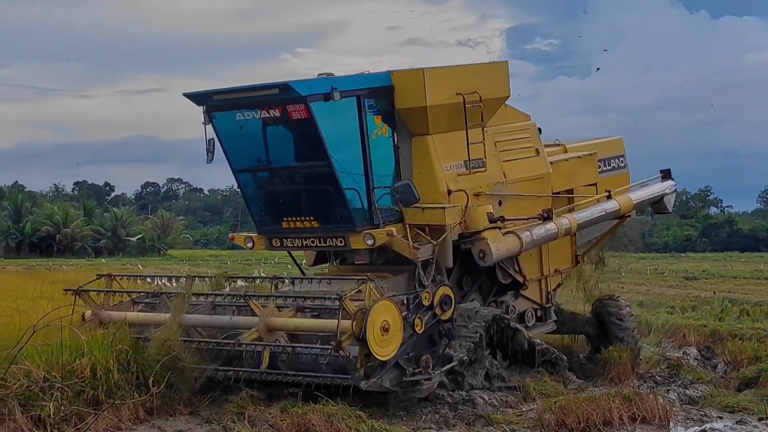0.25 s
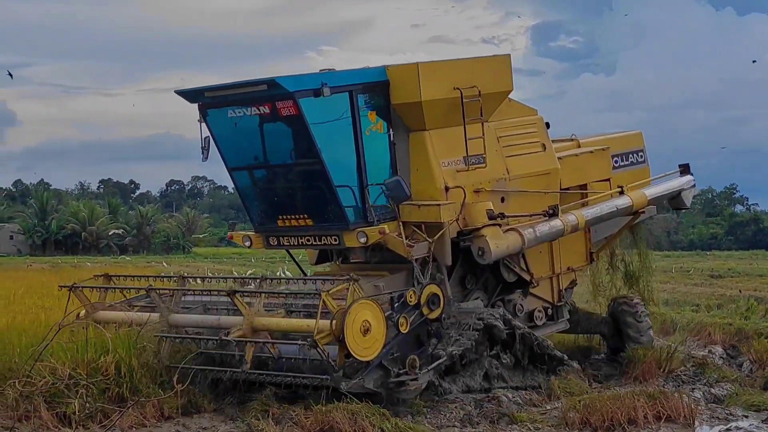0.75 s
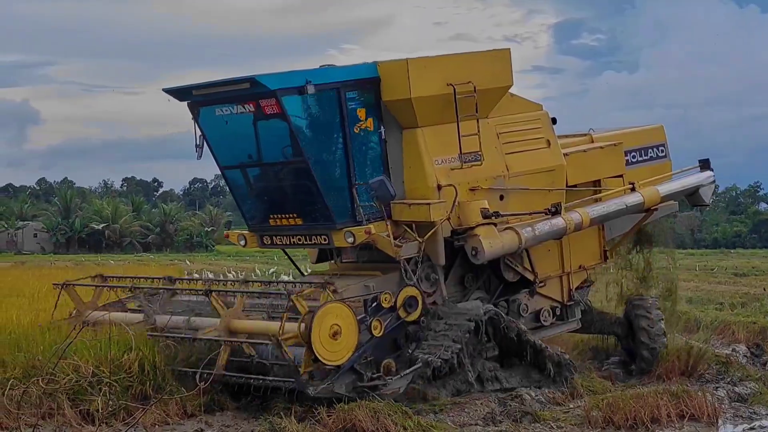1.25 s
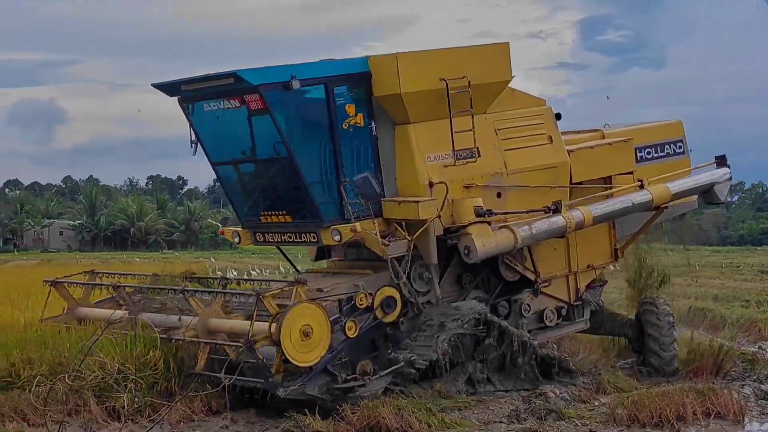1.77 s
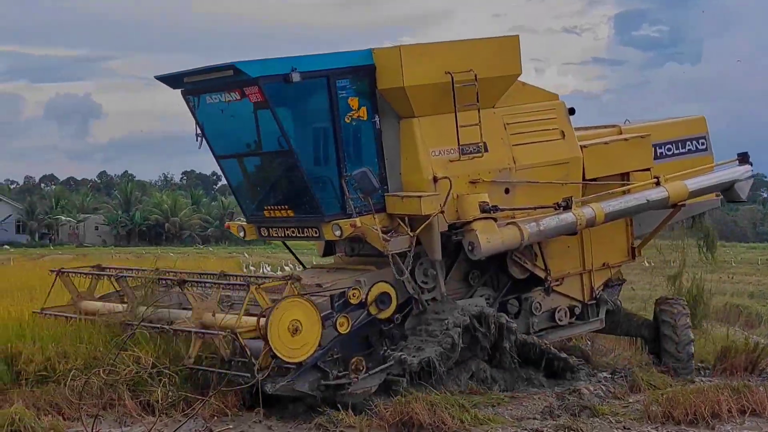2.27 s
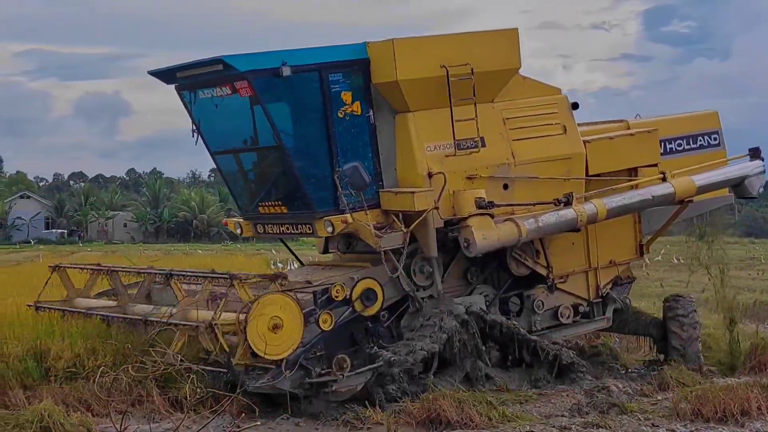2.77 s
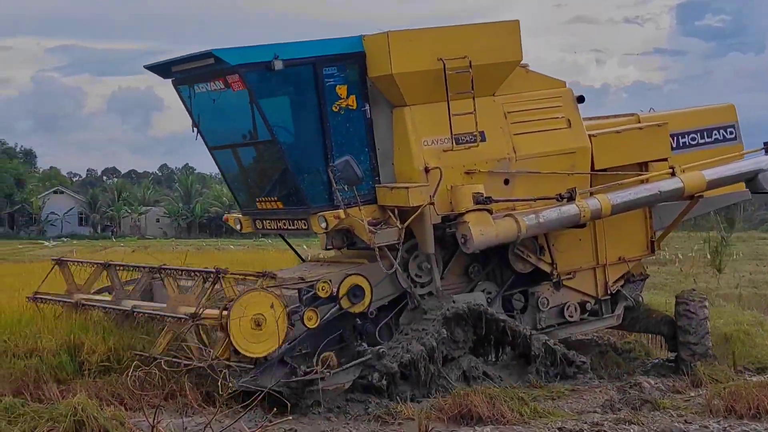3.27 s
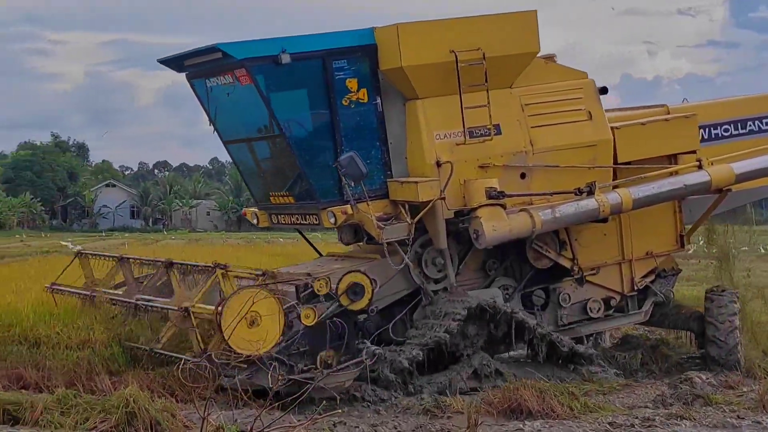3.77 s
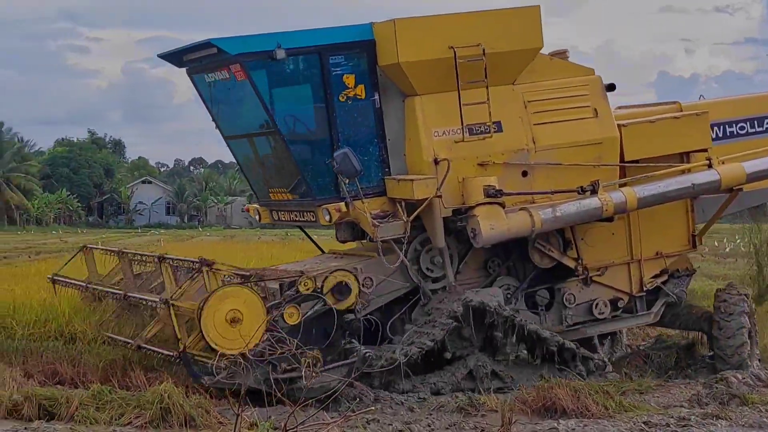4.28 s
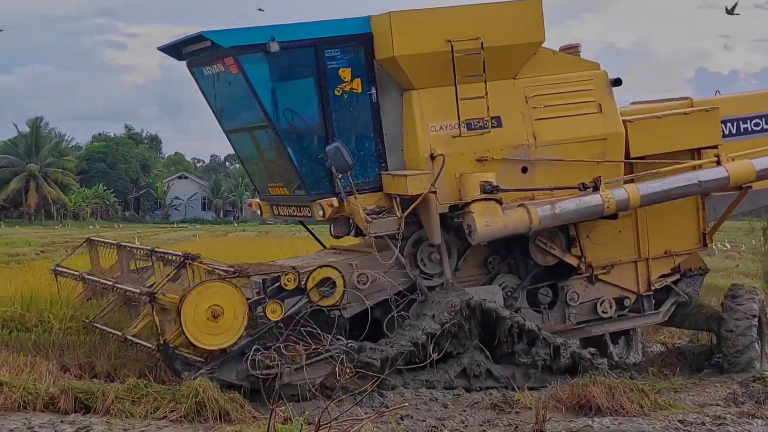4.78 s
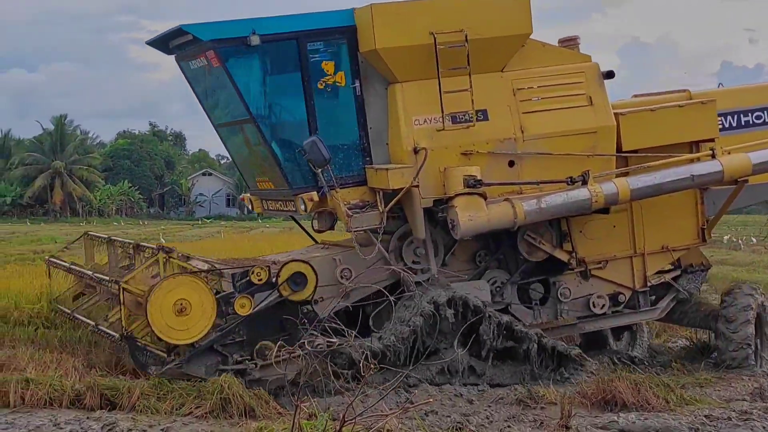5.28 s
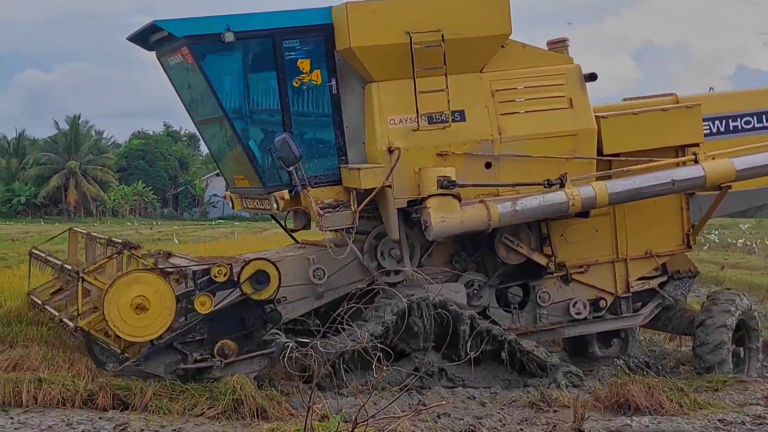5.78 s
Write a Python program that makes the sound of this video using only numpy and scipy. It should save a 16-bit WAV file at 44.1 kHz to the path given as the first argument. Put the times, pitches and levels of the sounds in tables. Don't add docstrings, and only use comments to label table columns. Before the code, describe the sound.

A big diesel harvester drones at a steady low pitch, dull rumble beneath, while rattling metallic knocks and straw hiss grow as its side turns closer.

```python
import sys
import numpy as np
from scipy import signal
from scipy.io import wavfile
from scipy.ndimage import uniform_filter1d, minimum_filter1d

SR = 44100
rng = np.random.default_rng(int(sys.argv[2]) if len(sys.argv) > 2 else 0)


def decibels_to_gain(level_db):
    exponent = np.asarray(level_db, float) / 20
    return 10 ** exponent


def transcribe(signal):
    frames = np.atleast_2d(signal).T
    limited = np.clip(frames, -1, 1)
    pcm = np.round(limited * 32767).astype(np.int16)
    wavfile.write(sys.argv[1], SR, pcm)


N = 266364
LAG_S = .0005


def evened(x):
    return x / np.sqrt(np.mean(x ** 2) + 1e-20)


def curves(rows):
    s, *columns = np.transpose(rows)
    return [np.interp(np.arange(N) / SR, s, c) for c in columns]


def read(points, hz):
    f, *columns = np.transpose(points)
    return np.array([np.interp(np.log(hz + 1), np.log(f), c) for c in columns])


def turned(s):
    # start_s, end_s
    turn_s = [1.2, 4.8]
    return np.clip((s - turn_s[0]) / (turn_s[1] - turn_s[0]), 0, 1)


def bay_facing():
    # time_s, share (0-1)
    openness = [(0, 0), (1.5, 0), (2.5, 0.46), (3.1, 0.59), (3.7, 0.51), (4.1, 0.53), (4.36, 0.58),
                (4.45, 0.89), (4.8, 0.77), (5.55, 0.84), (5.75, 0.41), (6.04, 0.62)]
    return curves(openness)[0]


def exhaust(turns):
    multiples = [1 / 3, 2 / 3, 4 / 3, 3, 4, 5, 6, 7, 8]
    signs = [1, 1, 1, 1, -1, 1, -1, 1, 1]
    # before_turn_db, after_turn_db
    orders_db = [(-44, -42), (-33, -28), (-38, -29), (-35, -38), (-34, -25), (-35, -44), (-37, -24),
                 (-50, -40), (-35, -36)]
    turn = turned(np.arange(N) / SR)
    angle = 2 * np.pi * (turns + np.array([[1], [-1]]) * 0.013)
    second_phase = 2.33 - 2.4 * turn
    out = np.cos(angle) + decibels_to_gain(-18.5 + turn) * np.cos(2 * angle + second_phase)
    for k, (before_db, after_db), sign in zip(multiples, orders_db, signs):
        size = (1 - turn) * decibels_to_gain(before_db) + sign * turn * decibels_to_gain(after_db)
        out += size * np.cos(k * angle + 2 * np.pi * rng.random())
    drone_db = -5.5 - 1.6 * turn
    return np.sqrt(2) * decibels_to_gain(drone_db) * out


def wash(spectrum, patchy_db, ridge_db, flicker_db):
    # frequency_hz, coherence (0-1)
    coherence = [(25, .97), (125, .99), (250, .97), (500, .94), (1000, .85), (2000, .8), (4000, .75),
                 (8000, .58), (15000, .45)]
    # frequency_hz, phase_rad
    port_lead = [(0, 0), (1380, 0.5), (2240, 5.6), (3100, 6.9), (3620, 12.0), (4740, 13.2), (6460, 18.9),
                 (7670, 25.3), (8270, 31.2), (9820, 34.6), (10900, 35.6), (12600, 43.1), (13400, 43.9),
                 (15700, 54.2)]
    frames, hz = N // 256 + 5, np.fft.rfftfreq(1024, 1 / SR)
    a, b, c, d, patches, ridges = rng.standard_normal((frames, 513, 6)).T
    patches = uniform_filter1d(uniform_filter1d(patches, size=14, axis=0), size=10, axis=1)
    ridges = uniform_filter1d(uniform_filter1d(ridges, size=3, axis=0), size=120, axis=1)
    flicker = uniform_filter1d(rng.standard_normal(frames), size=6)
    same = np.clip(read(coherence, hz)[0], 0, 1)[:, None]
    late = np.exp(-1j * np.interp(hz, *np.transpose(port_lead)))[:, None]
    left = a + 1j * b
    right = same * late * left + np.sqrt(1 - same ** 2) * (c + 1j * d)
    turn = turned(np.arange(frames) * 256 / SR)
    colour_db = read(spectrum, hz)[:, :, None]
    colour_db = (1 - turn) * colour_db[:2] + turn * colour_db[2:]
    change_db = patchy_db * evened(patches) + ridge_db * evened(ridges) + flicker_db * evened(flicker)
    z = np.array([left, right]) * decibels_to_gain(colour_db + change_db)
    return evened(signal.istft(z, nperseg=1024, noverlap=768)[1][:, :N])


def threshing_roar():
    # frequency_hz, header_left_db, header_right_db, engine_left_db, engine_right_db
    roar_spectrum = [(25, -23, -23, -23, -23), (45, -16, -16, -16, -16), (68.6, 2, 3, 1, 1),
                     (162, -5, 5.5, -7.5, 1.5), (308, -1.5, -1.5, -6, -3.5), (447, -8.0, -9.5, -8, -10),
                     (564, -10, -6.5, -11.5, -11.5), (725, -13.5, -8.5, -8, -5),
                     (820, -18.5, -11.5, -14, -14), (940, -5.5, -11, -5.5, -5.5),
                     (1100, -17.5, -5.5, -16, -8), (1140, -34, -16.0, -43, -24),
                     (1250, -14.5, -24, -17, -20.5), (1810, -18.5, -17, -19.5, -15)]
    spectrum = list(roar_spectrum) + [(2390, -55, -60, -64, -60)]
    return decibels_to_gain(-18) * wash(spectrum, patchy_db=0.35, ridge_db=1.0, flicker_db=0.0)


def straw_hiss(turns):
    # frequency_hz, header_left_db, header_right_db, engine_left_db, engine_right_db
    hiss_spectrum = [(1985, -4.5, -20, -10.5, -9), (2110, -8, -3, -14, -5), (2710, -7, -3, -9, -13),
                     (3390, -1, 4.5, -19, -2), (4630, -7.5, -9, -9, -8.5), (5670, -6.5, -7, -13, -12),
                     (5700, -42.5, -16.5, -37, -16), (7080, -6, -10, -15.5, -22),
                     (7860, -41.5, -12.5, -30, -21.5), (8900, -12, -22.5, -22, -26.5),
                     (10500, -26, -16.5, -24, -23.5), (12800, -27, -17.5, -25.5, -19),
                     (14100, -30, -15.5, -35, -26), (16300, -24, -20, -43, -31)]
    spectrum = [(1370, -31, -30, -19, -40)] + list(hiss_spectrum) + [(16000, -78, -91, -96, -84)]
    hiss = wash(spectrum, patchy_db=1.5, ridge_db=2.5, flicker_db=0.6)
    throb = 1 + 0.028 * np.cos(2 * np.pi * (turns - .5))
    level_db = -26 + 8 * bay_facing()
    return decibels_to_gain(level_db) * throb * hiss


def ports(near, stray, share):
    share = np.clip(share, 0, 1)
    right = share * np.roll(near, round(LAG_S * SR)) + np.sqrt(1 - share ** 2) * stray
    return np.array([near, right])


def blows(turns, column, delay, spread_db, mood_db):
    # knock_db, tick_db
    cylinder_db = [(-3, -8), (-3, 0), (-3, -9), (-7, -12), (0, 0), (-8, -12)]
    path_delay = .1 * turned(np.arange(N) / SR)
    firing = np.floor(turns - delay - path_delay).astype(int)
    at = np.flatnonzero(np.diff(firing)) + 1
    luck, cylinder = rng.standard_normal((len(at), 3)), firing[at] % 6
    size_db = np.array(cylinder_db)[cylinder, column] + spread_db * luck[:, 0]
    size_db += mood_db * evened(uniform_filter1d(luck[:, 1], size=9))
    jitter = np.round(1.5 * luck[:, 2]).astype(int)
    return at + jitter, cylinder, evened(decibels_to_gain(size_db))


def hard(column, lift_db):
    # start_s, tick_db, knock_db
    hard_knocks = [(0.2826, -31, -23), (1.2407, -29, -24), (1.6192, -25, -20), (1.818, -22.5, -16),
                   (2.2463, -29, -22), (2.8507, -30, -22), (2.902, -23, -11), (2.9507, -30, -14),
                   (3.4036, -26, -7.5), (3.455, -21, -8), (3.958, -26, -14), (4.061, -32, -21),
                   (4.31, -24, -10), (4.4107, -19, -9), (4.4623, -17, -9), (4.616, -22, -5),
                   (4.7924, -26, -11), (4.8162, -24, -15), (4.8667, -20, -8), (4.9701, -19, -17),
                   (5.0183, -21, -13), (5.0696, -20, -11), (5.1703, -22, -26), (5.221, -22, -17),
                   (5.247, -16, -11), (5.3238, -10.5, -9), (5.399, -16, -19), (5.501, -11, -6),
                   (5.5256, -12.5, -7), (5.679, -26, -15)]
    rows = np.array(hard_knocks)
    at = (rows[:, 0] * SR).astype(int)
    return at, np.zeros(len(rows), int), decibels_to_gain(rows[:, column] + lift_db)


def burst(at, cylinder, size, rise_s, fall_s, habit, share):
    step = np.arange(400)
    noise = habit * rng.standard_normal((2, 6, len(step)))[:, cylinder]
    fresh = rng.standard_normal((len(at), 2, len(step))).transpose(1, 0, 2)
    noise += np.sqrt(1 - habit ** 2) * fresh
    envelope = (1 - np.exp(-step / SR / rise_s)) * np.exp(-step / SR / fall_s)
    puffs = noise * size[:, None] * envelope
    place = np.clip(at[:, None] + step, 0, N).ravel()
    near, stray = (np.bincount(place, p.ravel(), N + 1)[:N] for p in puffs)
    return ports(near, np.roll(stray, round(LAG_S * SR)), share)


def ring(x, hz, width):
    r = np.exp(-np.pi * width / SR)
    return signal.lfilter([1, 0, -1], [1, -2 * r * np.cos(2 * np.pi * hz / SR), r ** 2], x)


def knock(turns):
    # frequency_hz, width_hz, left_db, right_db
    mode_groups = [
        [(3500, 130, -8, -2), (3670, 110, -6, 0), (3270, 130, -15, -9), (7600, 220, -25, -16)],
        [(4020, 110, -3, 0), (4180, 130, -5, -2), (7520, 200, -26, -17)],
        [(4680, 200, -4, 1), (4930, 240, -7, -3), (12400, 600, -30, -18)],
    ]
    # hidden_db, gained_facing_db
    group_db = [(-38, 10.5), (-41, 11.5), (-43, 20)]
    hard_share_db = [-3, 3, 3]
    out, facing = np.zeros((2, N)), bay_facing()
    levels_db = [hidden_db + gained_db * facing for hidden_db, gained_db in group_db]
    flare = np.exp(-((np.arange(N) / SR - 3.55) / 0.35) ** 2)
    levels_db[1] = levels_db[1] + 8 * flare
    loudest_db = np.max(levels_db, 0)
    for modes, level_db, share_db in zip(mode_groups, levels_db, hard_share_db):
        at, cylinder, size = blows(turns, column=0, delay=.33, spread_db=3.2, mood_db=.8)
        size = size * decibels_to_gain(level_db[at.clip(0, N - 1)])
        drive = burst(at, cylinder, size, rise_s=.0001, fall_s=.0008, habit=.8, share=.93)
        at, cylinder, size = hard(column=2, lift_db=-11.0)
        size = size * decibels_to_gain(share_db + level_db[at] - loudest_db[at])
        drive += burst(at, cylinder, size, rise_s=.00015, fall_s=.0008, habit=0, share=.93)
        for k, (hz, width, *port_db) in enumerate(modes):
            gain = (-1) ** k * decibels_to_gain(port_db)[:, None]
            out += gain * ring(drive, hz, width) * np.sqrt(width / SR) * decibels_to_gain(23.5)
    return out


def coloured(x, spectrum):
    log_gain = np.log(decibels_to_gain(read(spectrum, abs(np.fft.fftfreq(2048, 1 / SR)))))
    taps = np.fft.ifft(np.exp(np.conj(signal.hilbert(log_gain)))).real[:, :1024]
    return signal.oaconvolve(x, taps, axes=1)[:, :N]


def valves(turns):
    # frequency_hz, left_db, right_db
    tick_spectrum = [(2000, -30, -30), (3500, -12, -12), (5300, -5, -5), (6600, -8, -6), (7550, -6, -1),
                     (8100, -11, -12), (8900, -8, -9), (10400, -11, -11), (11100, -9, -7), (11700, -10, -9),
                     (12400, -12, -2), (14000, -19, -13), (15600, -20, -17), (16000, -40, -40)]
    at, cylinder, size = blows(turns, column=1, delay=.36, spread_db=3, mood_db=.8)
    level_db = -17 + 2 * bay_facing()
    size = size * decibels_to_gain(level_db[at.clip(0, N - 1)])
    ticks = burst(at, cylinder, size, rise_s=.00006, fall_s=.0016, habit=.5, share=.75)
    heavy = hard(column=1, lift_db=16.5)
    ticks += burst(*heavy, rise_s=.00006, fall_s=.0016, habit=0, share=.75)
    return coloured(ticks, tick_spectrum)


def bay(x):
    s = np.arange(SR // 20) / SR
    tail = rng.standard_normal((2, len(s))) * np.exp(-s / .009)
    tail /= np.linalg.norm(tail[0])
    return x + decibels_to_gain(-7) * signal.oaconvolve(x, tail, axes=1)[:, :N]


def scene():
    # time_s, rate_hz
    firing_rate = [(0.0, 119.014), (0.55, 118.838), (1.1, 119.236), (1.65, 119.522), (2.2, 119.465),
                   (2.75, 119.278), (3.29, 118.801), (3.84, 119.572), (4.39, 118.8), (4.94, 118.416),
                   (5.49, 118.627), (6.04, 118.745)]
    turns = .387 + np.cumsum(curves(firing_rate)[0]) / SR
    air = threshing_roar() + straw_hiss(turns)
    return exhaust(turns) + air + bay(knock(turns) + valves(turns))


def top_cut(x):
    return signal.sosfilt(signal.butter(12, 16090, fs=SR, output="sos"), x)


def record(dry):
    over_db = 20 * np.log10(np.maximum(abs(dry).max(0) * decibels_to_gain(0.5), 1))
    fall_db = np.arange(N) * 235. / SR
    held_db = np.maximum(np.maximum.accumulate(over_db + fall_db) - fall_db, 0)
    held_db = uniform_filter1d(-minimum_filter1d(-held_db, size=90), size=60)
    ducked = dry * decibels_to_gain(.7 - .97 * held_db)
    low_cut = signal.butter(2, 35, "high", fs=SR, output="sos")
    mix = np.clip(signal.sosfiltfilt(low_cut, ducked), -1, 1)
    return top_cut(mix)


dry = scene()
out = record(dry)
transcribe(out)
```